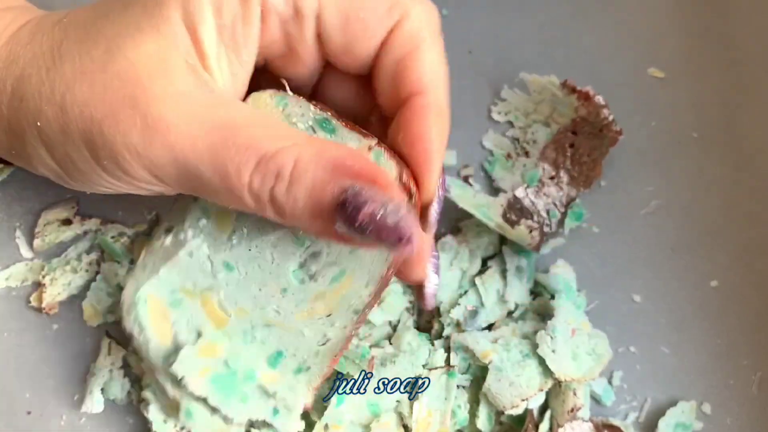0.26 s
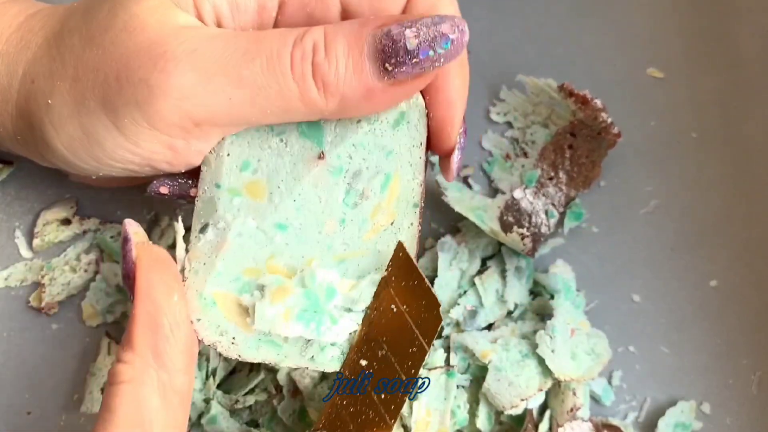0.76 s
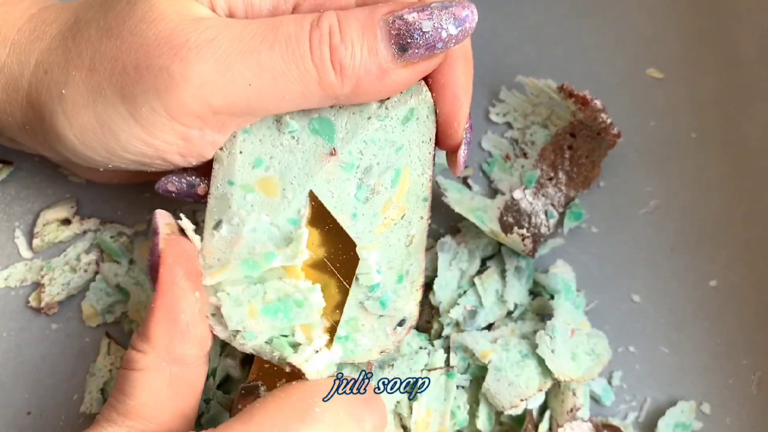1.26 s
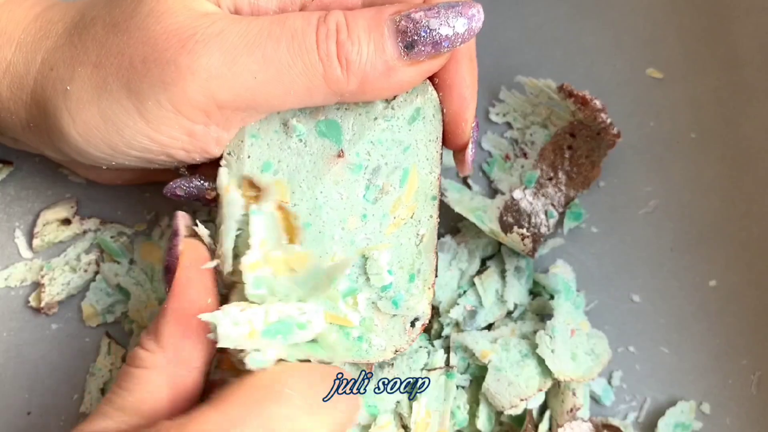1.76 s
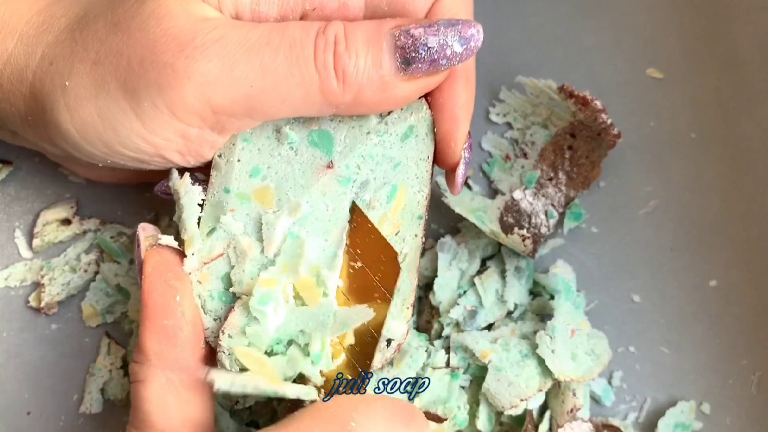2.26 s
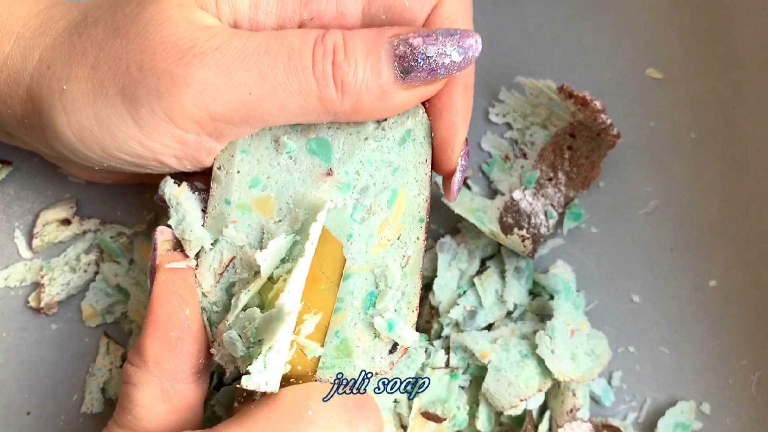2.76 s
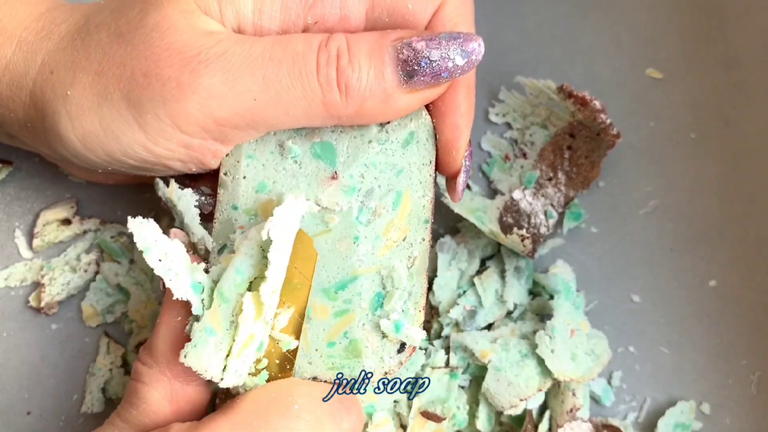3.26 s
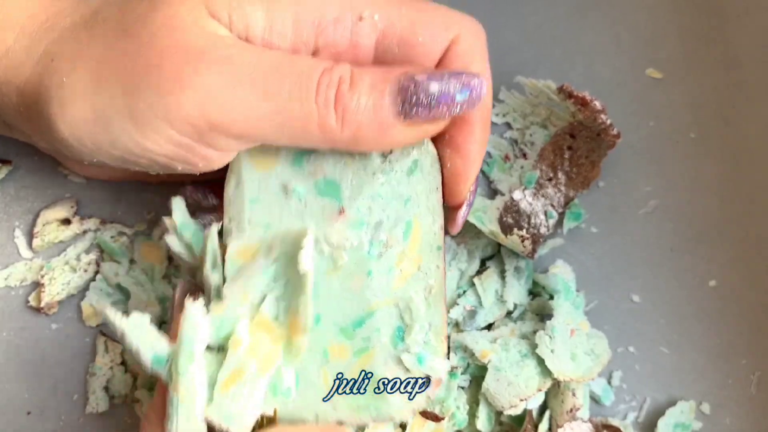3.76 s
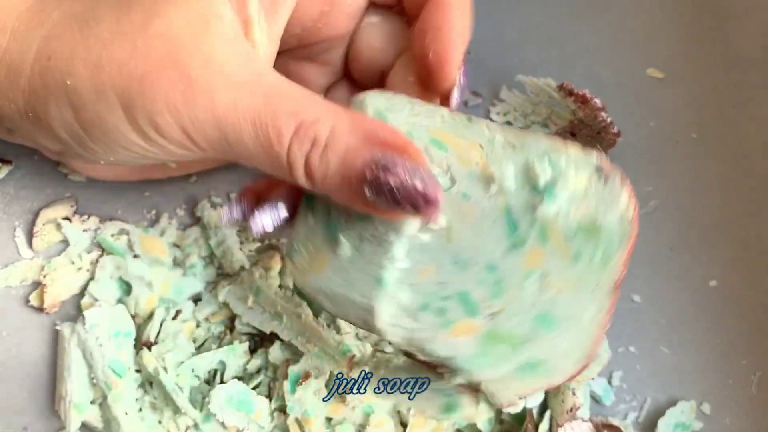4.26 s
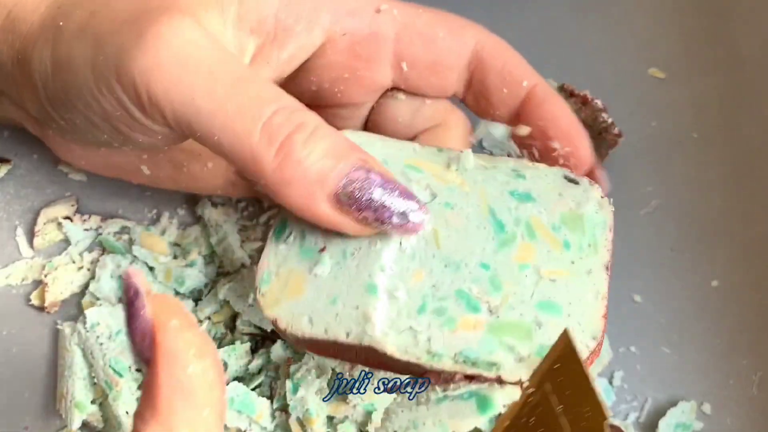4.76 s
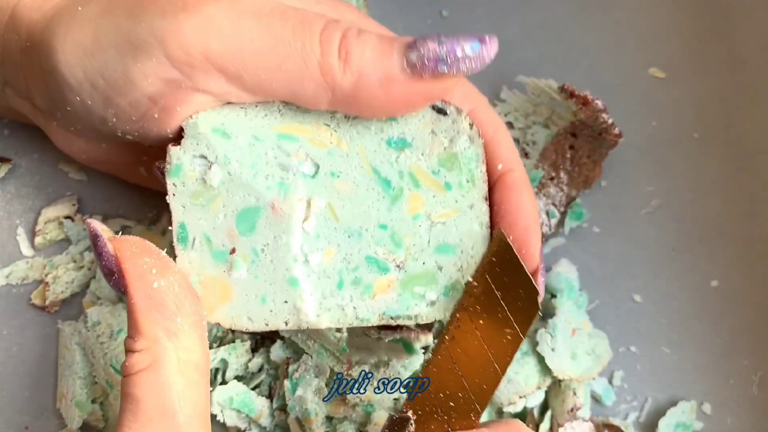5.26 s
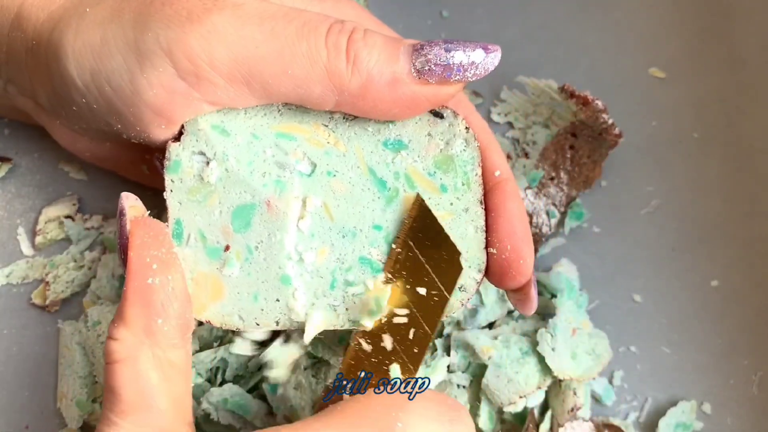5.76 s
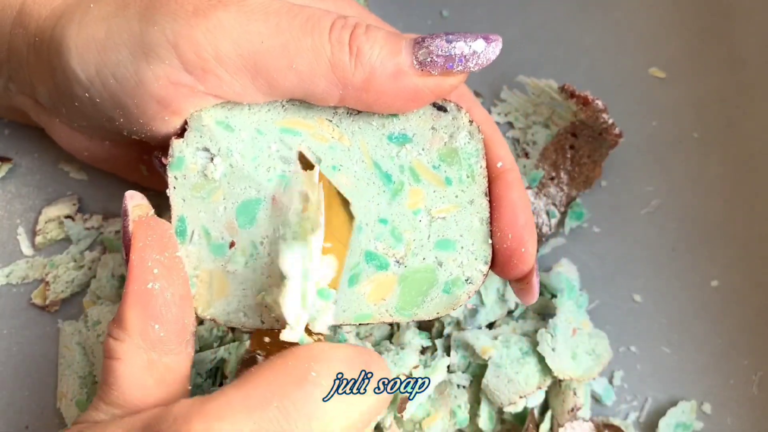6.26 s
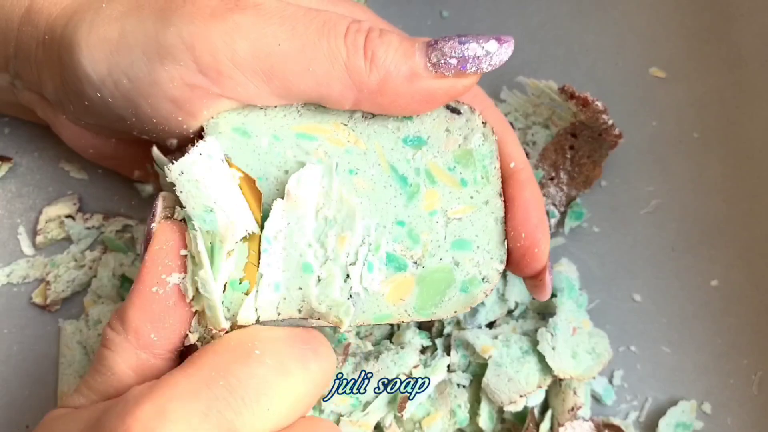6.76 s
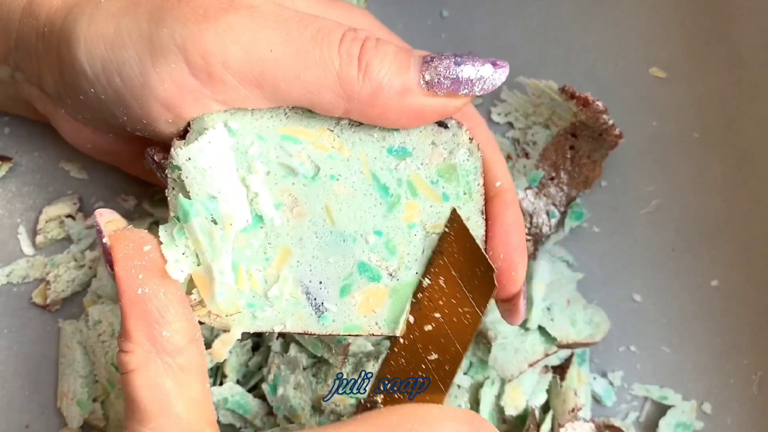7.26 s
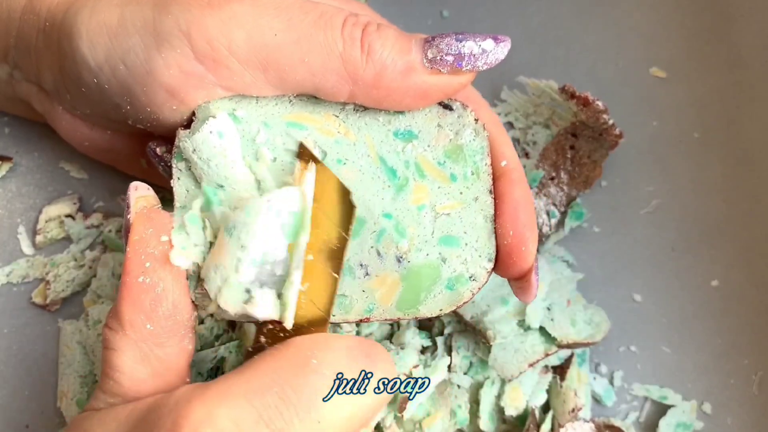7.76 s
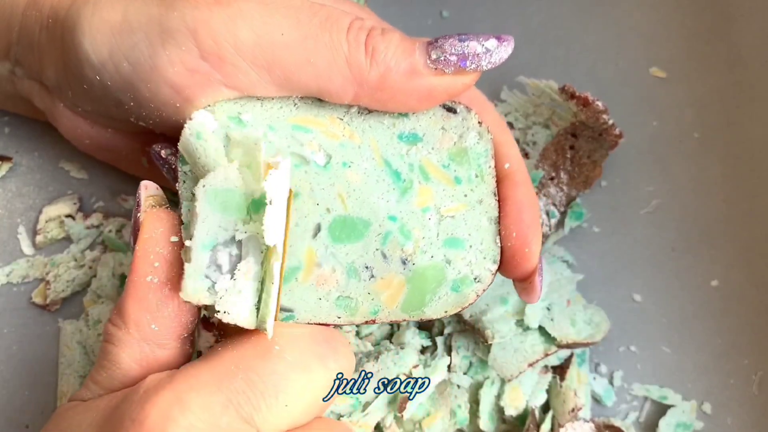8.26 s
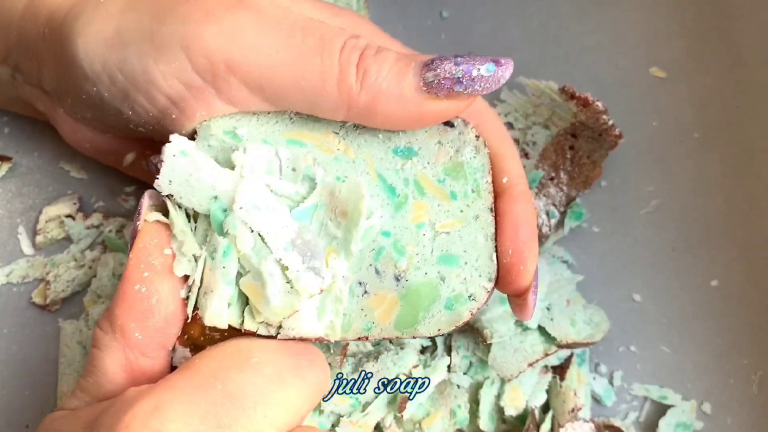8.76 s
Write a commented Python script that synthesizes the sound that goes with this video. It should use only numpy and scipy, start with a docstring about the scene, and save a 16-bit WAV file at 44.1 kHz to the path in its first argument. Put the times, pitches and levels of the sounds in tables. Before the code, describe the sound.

Close, dry crackling of soap flakes breaking under a scraping blade, interrupted by hollow bar knocks, small metallic ticks and soft crumb rustle.

```python
"""Shaving a dry soap bar

A thin blade shaves a hard dry soap bar held over a heap of flakes, close to a small microphone.
Flakes snap off in bright cracks, the blade rings briefly, the bar knocks and drags on the heap.
Crumbs rustle as filtered noise and tiny clicks; a low rumble, soft thumps and a faint hiss lie below.
Snaps, knocks and ticks are ragged pushes that shake bar, blade and flake; a small room adds its tail."""
import sys
import numpy as np
from scipy import signal
from scipy.fft import rfft, irfft
from scipy.io import wavfile
from scipy.ndimage import uniform_filter1d

SR = 44100
rng = np.random.default_rng(int(sys.argv[2]) if len(sys.argv) > 2 else 0)


def master(y):
    """Save y as 16-bit WAV."""
    cut = np.clip(np.atleast_2d(y).T, -1, 1)
    pcm = np.round(cut * 32767)  # scale
    wavfile.write(sys.argv[1], SR, pcm.astype(np.int16))


def convert_level_to_amplitude(level_db):
    """Map a level in decibels to its linear amplitude factor."""
    exponent = np.asarray(level_db, float) / 20
    return 10 ** exponent


N = 397341  # length of the scene in samples

# faint background hiss: (frequency [Hz], noise level [dB per Hz], relative)
HISS_COLOUR = [(120, -31), (200, 5), (392, -9), (1330, -28), (2130, -19), (5800, -9), (7480, -15.5),
               (15500, -15)]
HISS_DB = -51.5
# low resonances of the rumble: (frequency [Hz], width at half height [Hz])
HUMS = [(21.5, 19.5), (40, 10), (145.2, 9), (70.7, 15), (132, 74)]
# levels of the first three hums before they waver: one number each [dB]
STEADY_HUM_DB = [-38.5, -44, -44.5]
HUM_WAVER_DB = 2.5  # typical slow random change of each hum
# the hum near 70 Hz comes in while the blade is pushed through: (start [s], length [s], level [dB])
PUSHES = [(.95, 0.52, -37.5), (2.15, 1.46, -40), (5.65, 0.45, -34), (7.45, 0.34, -33.5)]
PUSH_RISE, PUSH_FALL, PUSH_IDLE_DB = 75, 30, -55  # dB per s before and after; level between pushes
# hands and bar jolt the table: (start [s], level before decay [dB], pitch [Hz])
THUMPS = [(1.02, -19.5, 60), (1.341, -19, 60), (4.119, -23, 99), (4.18, -7, 135), (4.385, -15, 125),
          (6.291, -16, 93), (7.416, -18, 60), (7.504, -18, 111)]
THUMP_CYCLES = 1.2  # cycles to lose nearly two thirds of the swing

# colour of crumbs sliding: (frequency [Hz], noise level [dB per Hz], relative)
RUB_COLOUR = [(240, -48), (400, 5.5), (942, -2.5), (2150, -1.5), (8400, -5), (15500, -21)]
# the bar drags over heap and hand: (start [s], length [s], strength [dB])
DRAGS = [(0, 0.18, -30.5), (.94, 0.46, -43), (1.82, 0.15, -35.5), (2.12, 0.4, -38), (3.85, 0.44, -36.5),
         (4.11, 0.13, -19.5), (4.38, 0.034, -31), (4.45, 0.28, -39.5), (4.85, 0.39, -41.5),
         (5.55, 0.22, -36.5), (5.82, 0.15, -33), (6.89, 0.2, -29), (7.14, 0.26, -31.5), (7.65, 0.35, -42),
         (8.42, 0.15, -42), (8.9, 0.53, -55)]
# the blade bites into the soap:
# (start [s], length [s], crackle strength [dB], scrape strength against the crackle [dB])
BITES = [(0, 0.25, -39.5, 6), (0.277, 0.22, -42, 5.5), (0.632, 0.23, -49, 8.5), (0.941, 0.11, -26.5, -3.5),
         (1.084, 0.18, -34, -9), (1.299, 0.09, -26, -7.5), (1.562, 0.041, -19.5, -5),
         (1.806, 0.11, -31.5, 7.5), (2.13, 0.039, -26.5, -1.5), (2.196, 0.17, -34, -5.5),
         (2.433, 0.06, -34.5, -4), (2.58, 0.11, -42, -3), (2.732, 0.068, -38.5, -12),
         (2.839, 0.049, -34, -2.5), (3.14, 0.034, -34.5, -4), (3.31, 0.077, -42, -3),
         (3.469, 0.11, -32.5, -4), (3.706, 0.3, -41, 2.5), (3.997, 0.079, -30, 3.5), (4.1, 0.23, -48.5, 16),
         (4.404, 0.088, -50.5, 21.5), (4.497, 0.23, -40, 6.5), (4.786, 0.34, -42.5, 4),
         (5.175, 0.03, -34, 4), (5.632, 0.057, -25, 4.5), (5.852, 0.13, -32.5, -3), (6.023, 0.05, -27, -3),
         (6.127, 0.019, -28, -5.5), (6.235, 0.14, -30, -5.5), (6.495, 0.07, -32, 0.5),
         (6.596, 0.12, -29.5, 0.5), (6.84, 0.082, -37, 3), (6.951, 0.027, -28.5, 13), (7.23, 0.11, -54, 8),
         (7.316, 0.12, -35, 7), (7.451, 0.051, -30, 0), (7.555, 0.052, -32.5, 4), (7.692, 0.25, -38, -6.5),
         (8.048, 0.1, -45, -1), (8.432, 0.17, -37.5, -2.5), (8.602, 0.17, -40, -4.5), (8.887, 0.73, -39, 2)]
BITE_RISE, BITE_FALL, DRAG_RISE, DRAG_FALL = 1150, 460, 1200, 235  # dB per s before and after a stroke
BITE_SAG_DB, DRAG_SAG_DB = 1, 4  # strength lost from start to end of a stroke
IDLE_DRAG_DB, IDLE_SCRAPE_DB, IDLE_CRACKLE_DB = -50, -52.5, -49  # crumbs trickle between strokes
# a flat scrape makes one blade mode sing: (start [s], length [s], level [dB], pitch [Hz])
SQUEAKS = [(1.57, 0.029, -27, 2180), (1.813, 0.08, -23.5, 2160), (5.633, 0.087, -28, 1770),
           (6.951, 0.037, -17, 1640), (6.942, 0.074, -25, 3500)]
SQUEAK_HALF_WIDTH_HZ, SQUEAK_RISE, SQUEAK_FALL = 210, 2600, 340  # then dB per s before and after

# ways the bar and the blade can ring, before chance shifts them:
# (frequency [Hz], level [dB], time to fade by 60 dB [s])
BAR_MODES = [(146, 1.5, 0.06), (238, 2.5, 0.025), (358, 1.5, 0.02), (548, 6, 0.016), (700, 14, 0.0075),
             (860, -6.5, 0.054), (1060, 1, 0.024)]
BLADE_MODES = [(1380, -6, .010), (1680, -3, .014), (1950, 0, .011), (2200, -1, .009), (2650, -3, .006),
               (3450, -4, .008), (4200, -2, .004)]
# colour of a flake's snap: (frequency [Hz], noise level [dB per Hz], relative)
FLAKE_COLOUR = [(2060, -11), (3500, 2), (5260, 1), (6360, 7), (8860, 0.5), (9990, -1), (11500, 1),
                (13600, -1), (15400, -7), (17000, -9)]
SPLINTER_HZ = 1700  # flakes are too small to sound below this
FOCUS_DB_PER_OCTAVE = 16  # modes far from the pitch of a blow wake less
SHAKEN_BLADE_HZ, KNOCKED_BLADE_HZ = 2490, 2980  # where the blade answers most to a snap or a knock
CONTACT_S, REBOUND_S, BLOW_DB = 0.00011, 0.0018, -3  # quick push, slow pull of air; level against the ring
FIRST_HIT_DB = 3  # a 1 ms break opens with one hit this far above the rest; longer ones open softer

# In the next three tables, a level is the energy of a full-level sound lasting 1 ms, in dB.
# flakes snap off and shake the blade:
# (time [s], snap level [dB], blade level against the snap [dB], length of the break [ms], pitch [Hz])
SNAPS = [(0.467, -5, -20, 5.7, 4130), (0.871, -22.5, -4, 1.3, 7540), (0.956, -14, -12, 4.1, 7200),
         (0.963, -10.5, -9, 3.6, 7300), (1.0155, -5.5, -16, 3.9, 11050), (1.082, -11, -26, 8.6, 9000),
         (1.111, -11.5, -9.5, 3.9, 7100), (1.143, -14, -23, 10, 11700), (1.156, -15.5, -17, 1.5, 11200),
         (1.184, -18, -19, 6.5, 8700), (1.298, -25, -18, 1.6, 13600), (1.311, -16, -25, 0.62, 9100),
         (1.344, -18, -3, 4.3, 9090.0), (1.363, -21, 1, 1.6, 8550), (1.384, -12.5, -25, 1.4, 9200),
         (1.394, -8, -11.5, 3.6, 9400), (1.478, -14, -2.5, 9, 7050), (1.548, -18.5, -7, 1.1, 9000),
         (1.5575, -10, -11, 1.2, 9200), (1.5614, -5.5, -21, 1.2, 9600), (1.5647, -8.5, -10, 1, 7500),
         (1.5697, -9, -15, 1.5, 8610.0), (1.6072, -15, -8, 2, 8500), (1.902, -9.5, -1, 7.4, 7400),
         (2.336, -13, -8, 5.7, 9400), (2.44, -9.5, -18, 1.3, 12600), (2.445, -9.5, -6, 8.1, 8200),
         (2.5824, -15.5, -19, 2, 11900), (2.5884, -19.5, -24, 3.5, 7000), (2.749, -11.5, -10, 6.7, 11500),
         (2.895, -20, -6, 5.4, 7900), (2.981, -24, -13, 2.7, 9200), (3.1018, -22, -15, 5.1, 6700.0),
         (3.124, -13.5, -23, 2.9, 8340), (3.15, -12.5, -13.5, 7.1, 9200), (3.286, -12, -10.5, 2.1, 9300),
         (3.309, -15, -13, 0.31, 9100), (3.388, -15, -12, 3.8, 9300), (3.4843, -15, -8, 0.91, 7140),
         (3.4978, -6.5, -15, 1.1, 8600), (3.5027, -15, -12, 1, 7950), (3.5428, -3.5, -8.5, 1.75, 6900),
         (3.572, -16, -22, 1.9, 4170), (3.5746, -7, -27, 1.9, 7000), (3.5817, -14, -25, 0.71, 8000),
         (3.597, -16.5, -14, 1.7, 6470), (3.632, -15.5, -28, 1.9, 6600), (3.7667, -7.5, -42, 4.2, 6800),
         (3.7716, -8.5, -35, 11, 6300), (3.79, -17, -20, 7.1, 7320.0), (3.8123, -6.5, -30, 3.5, 7000),
         (3.827, -14, -9, 3.5, 4930), (3.853, -18, -9, 5.2, 6500), (3.9026, -16.5, -24, 1.8, 8750),
         (3.974, -25, -2, 0.87, 8000), (4.003, -13, -28, 4.2, 6760), (4.126, -14, -12, 2.5, 7350),
         (4.272, -25.5, 4, 3.6, 6940), (4.331, -24, -8, 3.4, 4520.0), (4.347, -25, -12, 1.8, 5000),
         (5.307, -31, 1, 2, 8400), (5.3226, -28.5, -6, 2.4, 5360), (5.637, -8, -3, 3.9, 7700),
         (5.848, -19, 1, 5.7, 6960), (5.897, -10, -7.5, 2.7, 7640), (5.9616, -16.5, -5, 9.9, 8800),
         (6.0227, -16.5, -18, 3.2, 7700), (6.073, -19, -22, 3.3, 11200), (6.139, -20, -10, 7.7, 7870),
         (6.29, -14.5, -10, 22, 11800), (6.345, -16.5, -19, 6.9, 7340), (6.441, -11, -21, 1.9, 7600),
         (6.572, -16, -10, 5.2, 5850), (6.6, -9, -10, 1.7, 6200), (6.6128, -12, -20, 1.1, 9000),
         (6.641, -7, -11.5, 10.6, 5040), (6.655, -14, -11, 1.1, 8900), (6.675, -7, -4, 10, 7050),
         (6.683, -8.5, -15, 13.4, 6700), (6.9, -17.5, -24, 1.8, 9200), (7.26, -20.5, 0, 5.2, 6740.0),
         (7.555, -5, -30, 5.9, 8230), (7.6325, -15.5, -8.5, 13, 13400), (7.785, -20.5, -3.5, 13, 8500),
         (7.936, -21, -6, 7.2, 6700), (7.975, -21, -14, 8.6, 9600), (8.103, -20.5, -7.5, 17, 9000),
         (8.426, -15, -17, 13, 8260), (8.454, -7, -22, 2.1, 8300), (8.4647, -14, -20, 2.1, 7170.0),
         (8.5026, -6, -30, 1.6, 6730), (8.521, -16.5, -3.5, 0.99, 7100), (8.682, -18, -23, 5.3, 6900),
         (8.7201, -6, -41, 1.8, 6540), (8.727, -9.5, -37, 5.6, 6470), (8.747, -8.5, -34, 1.7, 8400),
         (8.7509, -5, -30, 0.78, 6700), (8.864, -24, -3, 1.6, 7250)]
# the bar knocks on heap, hand or blade:
# (time [s], knock level [dB], blade level against the knock [dB], length [ms], pitch [Hz])
KNOCKS = [(0.0489, -9.5, -15, 1.6, 940), (0.107, -8, -10, 5.9, 686), (0.261, -20.5, -27, 9, 880),
          (0.331, -20.5, -20, 11, 690.0), (0.5252, -8.5, -10.5, 1.3, 1060), (0.9709, -21.5, -4, 11, 1030.0),
          (1.0133, -15.5, 1.5, 6.1, 980), (1.088, -22, -9, 9.3, 900), (1.906, -19.5, -11, 4.6, 804),
          (2.06, -25, -15, 4.4, 750.0), (2.239, -7, -8, 2.1, 1030), (2.401, -17.5, -25, 3.4, 700),
          (2.435, -14.5, -13, 8.9, 700), (3.508, -18.5, -15, 9.1, 657), (3.862, -25, -8, 2.6, 800),
          (3.882, -7, -20, 2.2, 660), (4.0257, -8, -12, 7.7, 935), (4.079, -11, -17, 0.93, 650),
          (4.119, -6, -22, 3.1, 584), (4.128, -12, -13, 2.7, 800), (4.151, -5.5, -6, 2.3, 860.0),
          (4.178, -7, -4, 1.4, 580.0), (4.185, -8.5, -20, 1, 600), (4.202, -7, -21, 3.7, 650.0),
          (4.2072, -10.5, -11, 4.4, 830), (4.215, -8, -9, 1, 860.0), (4.262, -21.5, 3, 9.3, 950.0),
          (4.284, -17.5, -4, 6.4, 620.0), (4.3203, -20, -15, 5.1, 800), (4.378, -5.5, 0.5, 1.5, 620),
          (4.4225, -16.5, 1.5, 0.48, 900), (4.548, -12, -12, 4, 1020), (4.644, -21.5, -1.5, 12, 650.0),
          (4.835, -24.5, 4, 4.1, 990), (4.888, -10, -6.5, 2.6, 760), (5.757, -23, -16, 5, 600),
          (5.8118, -13.5, -11, 3.7, 655), (5.87, -10, -11, 11, 630), (6.29, -19.5, -9, 19, 736),
          (6.439, -27, -15, 1.6, 600), (6.853, -17.5, -7, 4.9, 590), (6.8935, -9, -25, 2.7, 780),
          (6.912, -19, -19, 3.8, 700), (7.017, -15.5, -17, 4.5, 800), (7.042, -13.5, -23, 8.6, 500.0),
          (7.088, -18, -17, 2.9, 560.0), (7.126, -17.5, -4.5, 1.8, 900), (7.134, -20.5, -25, 3.6, 700),
          (7.182, -19, -17, 6.5, 745), (7.206, -24, -5, 2.9, 1000), (7.368, -19, -22, 1.8, 790),
          (7.557, -17, -22, 10, 1060.0), (8.427, -26, -7, 4.3, 540.0)]
# the blade catches and ticks: (time [s], tick level [dB], length [ms], pitch [Hz])
TICKS = [(0.475, -14.5, 2, 4100), (0.683, -18, 13.6, 2600), (0.988, -14, 13, 2400),
         (1.857, -18, 7.3, 2000.0), (2.145, -24, 7.6, 2390.0), (2.305, -19, 3.4, 2800),
         (4.379, -5, 5.4, 3000), (4.3915, -5.5, 3.8, 3050), (4.476, -21, 1.4, 2430),
         (4.707, -11, 7.7, 2200), (4.921, -23.5, 2, 1700), (5.088, -21, 0.62, 2410),
         (5.4, -29.5, 2.5, 3680), (5.694, -13, 5.2, 1780), (6.533, -22.5, 1.1, 1880),
         (6.6036, -12, 0.69, 2200), (6.97, -8.5, 2.7, 1600), (6.977, -2.5, 9.5, 1610),
         (6.987, -13, 8.5, 1640.0), (7.274, -17, 1.8, 2480), (7.418, -17, 7.3, 1850.0),
         (7.5, -12.5, 9.3, 1700), (8.619, -27, 1.5, 1720.0), (8.879, -26.5, 2, 1870.0)]
# what else each break shakes, against its main sound
SNAP_BAR_DB, KNOCK_FLAKE_DB, TICK_BAR_DB, TICK_FLAKE_DB = -26.5, -20, -8, -4.5

# how long the room's tail lasts: (frequency [Hz], time to fade by 60 dB [s])
ROOM = [(300, 0.16), (1500, 0.081), (5000, 0.086), (13000, 0.038)]


def evened(x):
    """Scale a sound to an average strength (RMS) of one."""
    return x / np.sqrt(np.mean(x ** 2) + 1e-20)


def read(points, hz):
    """Read a curve between its points, along a logarithmic frequency scale."""
    f, value = np.transpose(points)
    return np.interp(np.log(hz + 1), np.log(f + 1), value)


def coloured(points, size):
    """Noise whose strength at each frequency follows a curve."""
    hz = np.fft.rfftfreq(size, 1 / SR)
    spectrum = rfft(rng.standard_normal(size)) * convert_level_to_amplitude(read(points, hz))
    return evened(irfft(spectrum, size))


def smooth_chance(shape, width):
    """Slow random wandering: noise averaged twice over a window of width samples."""
    once = uniform_filter1d(rng.standard_normal(shape), width)
    return evened(uniform_filter1d(once, width))


def strokes(rows, rise, fall, sag_db, idle_db):
    """Gain over time: each stroke swells to its start, sags, then dies away, over an idle level."""
    t = np.arange(0, N, 64) / SR
    power = convert_level_to_amplitude(2 * idle_db)
    for start, length, db in rows:
        before = np.maximum(start - t, 0)
        after = np.maximum(t - start - length, 0)
        progress = np.clip((t - start) / length, 0, 1)
        power = power + convert_level_to_amplitude(2 * (db - rise * before - fall * after - sag_db * progress))
    return np.interp(np.arange(N) / SR, t, np.sqrt(power))


def motion():
    """How hard the bar drags, the blade scrapes and the flakes crackle."""
    scrapes = [(start, length, db + blade_db) for start, length, db, blade_db in BITES]
    crackles = [row[:3] for row in BITES]
    drag = strokes(DRAGS, DRAG_RISE, DRAG_FALL, DRAG_SAG_DB, IDLE_DRAG_DB)
    scrape = strokes(scrapes, BITE_RISE, BITE_FALL, BITE_SAG_DB, IDLE_SCRAPE_DB)
    crackle = strokes(crackles, BITE_RISE, BITE_FALL, BITE_SAG_DB, IDLE_CRACKLE_DB)
    return drag, scrape, crackle


def hiss():
    """Faint steady noise with a fixed colour."""
    return convert_level_to_amplitude(HISS_DB) * coloured(HISS_COLOUR, size=N)


def rumble():
    """Noise in low resonances that waver: three steady, one under the pushes, one under the drags."""
    hz = np.fft.rfftfreq(N, 1 / SR)
    gains = [convert_level_to_amplitude(db) * np.ones(N) for db in STEADY_HUM_DB]
    gains.append(strokes(PUSHES, PUSH_RISE, PUSH_FALL, 0, PUSH_IDLE_DB))
    gains.append(convert_level_to_amplitude(-23.5) * motion()[0] ** 0.38)
    # all hums are evened together, so their wavers share one overall size
    noise = rfft(rng.standard_normal((len(HUMS), N)), axis=1)
    slow = rng.standard_normal((len(HUMS), N))
    for _ in range(2):
        slow = uniform_filter1d(slow, 6000, 1)
    wavers = convert_level_to_amplitude(HUM_WAVER_DB * evened(slow))
    out = np.zeros(N)
    for (f, width), gain, waver, spectrum in zip(HUMS, gains, wavers, noise):
        off_pitch = (hz - f * f / (hz + 1)) / width
        out += gain * waver * evened(irfft(spectrum / (1 + off_pitch ** 2), N))
    return out


def thumps():
    """The jolted table gives a few soft low swings that die within some cycles."""
    out, t = np.zeros(N + 6000), np.arange(6000) / SR
    for start, db, hz in THUMPS:
        swing = np.sin(2 * np.pi * hz * t) * np.exp(-t * hz / THUMP_CYCLES)
        out[round(start * SR):][:6000] -= convert_level_to_amplitude(db) * swing
    return out[:N]


def rubbing():
    """Crumbs too fine to tell apart: a dull rustle on the heap and a rasp that keeps the blade singing."""
    flicker = convert_level_to_amplitude(4.7 * smooth_chance(N, 110))
    drag, scrape, _ = motion()
    rustle = convert_level_to_amplitude(-3.5) * drag ** 0.52 * scrape ** 0.51 * coloured(RUB_COLOUR, size=N)
    t = np.arange(1500) / SR
    ring = sum(convert_level_to_amplitude(db - 60 * t / t60) * np.sin(2 * np.pi * hz * t) for hz, db, t60 in BLADE_MODES)
    singing = evened(signal.oaconvolve(rng.standard_normal(N), ring)[:N])
    rasp = convert_level_to_amplitude(7.0) * scrape ** 1.82 * singing
    return flicker * (rustle + rasp)


def squeaks():
    """Each flat scrape is rough noise in one narrow resonance of the blade."""
    hz = np.fft.rfftfreq(N, 1 / SR)
    out = np.zeros(N)
    for start, length, db, mode_hz in SQUEAKS:
        rough = rfft(rng.standard_normal(N) ** 3)  # cubing makes the noise spiky
        resonance = 1 / (1 + 1j * (hz - mode_hz) / SQUEAK_HALF_WIDTH_HZ) ** 2
        gain = strokes([(start, length, db)], SQUEAK_RISE, SQUEAK_FALL, 4.1, -99)
        out += gain * evened(irfft(rough * resonance, N))
    return out


def rung(modes, spread_db, pitch_hz=None):
    """A push wakes each mode by chance, slightly off pitch, most near the pitch of the blow if given."""
    t = np.arange(1500) / SR
    out = np.zeros(1500)
    for k, (hz, db, t60) in enumerate(modes):
        level_chance, pitch_chance = rng.standard_normal(2)
        far_db = FOCUS_DB_PER_OCTAVE * abs(np.log2(hz / pitch_hz)) if pitch_hz else 0
        fade = convert_level_to_amplitude(db - far_db + spread_db * level_chance - 60 * t / t60)
        direction = (-1) ** k  # neighbours start in opposite directions
        out += direction * fade * np.sin(2 * np.pi * hz * (1 + .06 * pitch_chance) * t)
    return out


def blow():
    """The bar as a whole jerks: a sharp push of air, then a slower pull back."""
    t = np.arange(1500) / SR
    push, pull = (t / s ** 2 * np.exp(-t / s) for s in (CONTACT_S, REBOUND_S))
    return evened(push - pull)


def snap(ring_db, t60, pitch_hz=None):
    """A flake breaks: a spit of wide noise plus a few cycles at a pitch set by its size."""
    t = np.arange(1500) / SR
    hz = pitch_hz or rng.uniform(5840, 9570)
    ring = convert_level_to_amplitude(ring_db) * np.sin(2 * np.pi * hz * t + 2 * np.pi * rng.random())
    spit = (coloured(FLAKE_COLOUR, size=1500) + ring) * convert_level_to_amplitude(-60 * t / t60)
    return signal.sosfilt(signal.butter(4, SPLINTER_HZ, "high", fs=SR, output="sos"), spit)


def tear(length_s):
    """A break takes a moment: a ragged run of pushes, a few of them sharp, that swells and dies."""
    u = np.arange(900) / SR / max(length_s, 1e-4)
    ragged = rng.standard_normal(900) ** 3 * np.sqrt(rng.exponential(1, 900))
    return ragged * u ** 1.77 * np.exp(-5 * u)


def shaken(length_s, spread_db, pitches_hz=(None, None, None), first_hit=0):
    """Bar, blade and flake under the same break, each with the energy of 1 ms at full level."""
    push = tear(length_s)
    push[0] = first_hit * np.linalg.norm(push)
    bar_hz, blade_hz, flake_hz = pitches_hz
    bar = evened(rung(BAR_MODES, spread_db, bar_hz)) + convert_level_to_amplitude(BLOW_DB) * blow()
    blade = rung(BLADE_MODES, spread_db, blade_hz)
    flake = snap(2.6, 0.0037, flake_hz)
    parts = np.array([signal.fftconvolve(push, part) for part in (bar, blade, flake)])
    return parts / np.linalg.norm(parts, axis=1)[:, None] * np.sqrt(SR / 1000)


def grains(shapes, per_s, spread_db):
    """Clumped random clicks, most small and a few large, each played with one of the shapes."""
    clumps = convert_level_to_amplitude(4.5 * smooth_chance(N, 190))
    draw, pick = rng.random(N), rng.integers(0, len(shapes), N)
    size = convert_level_to_amplitude(spread_db * np.minimum(rng.exponential(1, N), 3.5)) * np.sqrt(clumps)
    size *= draw < per_s / SR * clumps / clumps.mean()
    layers = []
    for part in zip(*shapes):  # bar, then blade, then flake
        layers.append(evened(sum(signal.oaconvolve(size * (pick == k), shape)[:N]
                                 for k, shape in enumerate(part))))
    return layers


def crumbling():
    """The same tiny breaks feed bar, blade and flakes; the more the flakes lead, the brighter they spit."""
    shapes = [shaken(.0005, spread_db=4) for _ in range(24)]
    bar, blade, flake = grains(shapes, per_s=900, spread_db=4.0)
    drag, scrape, crackle = motion()
    top = signal.sosfilt(signal.butter(2, 9000, "high", fs=SR, output="sos"), flake)
    lead = convert_level_to_amplitude(-2.0) * (crackle / scrape) ** 1.01 * (crackle / convert_level_to_amplitude(-34)) ** .2
    spitting = flake + (np.clip(lead, .15, 3) - 1) * top
    return convert_level_to_amplitude(-2.5) * (convert_level_to_amplitude(1.0) * drag * bar + convert_level_to_amplitude(-4.5) * scrape * blade + crackle * spitting)


def cracks():
    """Snaps, knocks and ticks shake bar, blade and flake in their own proportions."""
    # each break: time, level, shares of (bar, blade, flake), length, pitches of the same three
    breaks = [(s, db, (SNAP_BAR_DB, blade_db, 0), ms, (None, SHAKEN_BLADE_HZ, hz))
              for s, db, blade_db, ms, hz in SNAPS]
    breaks += [(s, db, (0, blade_db, KNOCK_FLAKE_DB), ms, (hz, KNOCKED_BLADE_HZ, None))
               for s, db, blade_db, ms, hz in KNOCKS]
    breaks += [(s, db, (TICK_BAR_DB, 0, TICK_FLAKE_DB), ms, (None, hz, None))
               for s, db, ms, hz in TICKS]
    out = np.zeros(N + 3000)
    for s, db, shares_db, length_ms, pitches_hz in breaks:
        parts = shaken(length_ms / 1000, 4, pitches_hz, convert_level_to_amplitude(FIRST_HIT_DB) / length_ms)
        sound = convert_level_to_amplitude(db + np.array(shares_db)) @ parts
        out[round(s * SR):][:len(sound)] += sound
    return out[:N]


def room(x):
    """The direct sound, then a short tail of scattered echoes that dies fastest in the high treble."""
    taps = np.zeros(SR // 3)
    at = np.arange(200, len(taps) - 20, 20)
    taps[at + rng.integers(0, 20, len(at))] = rng.choice([-1., 1.], len(at))
    hz, t, z = signal.stft(taps, SR, nperseg=256)
    fade = convert_level_to_amplitude(-60 * t / read(ROOM, hz)[:, None])
    tail = signal.istft(z * fade, SR, nperseg=256)[1]
    tail *= convert_level_to_amplitude(-15.5) / np.linalg.norm(tail)
    tail[0] += 1  # the direct sound
    return signal.oaconvolve(x, tail)[:N]


def scene():
    """Soap sounds in the room over rumble, thumps and hiss."""
    soap = cracks() + crumbling() + rubbing() + squeaks()
    soap = signal.sosfilt(signal.butter(2, 90, "high", fs=SR, output="sos"), soap)
    return (room(soap) + rumble() + thumps() + hiss())[None]


def band_limit(x):
    """A steep low-pass at the top of the band."""
    return signal.sosfilt(signal.butter(12, 16650, fs=SR, output="sos"), x)


def record(dry):
    """The microphone port dips near 6 kHz; peaks are clipped just below full scale; the top is cut."""
    port = dry - .4 * signal.lfilter(*signal.iirpeak(5800, 7.5, fs=SR), dry)
    clipped = np.clip(port, -.95, .95)
    edge_hz, edge_gain = [0, 15400, 15550, 16450, 16700, SR / 2], [1, 1, .25, .15, 0, 0]
    edge = signal.firwin2(511, edge_hz, edge_gain, fs=SR)
    mix = signal.oaconvolve(clipped, edge[None], "same")
    return band_limit(mix)


dry = scene()
out = record(dry)
master(out)
```